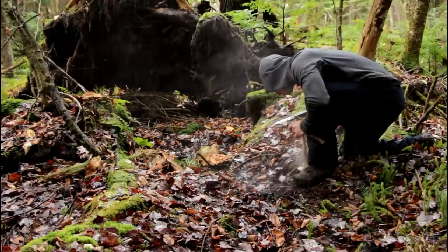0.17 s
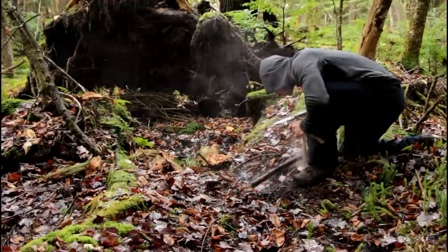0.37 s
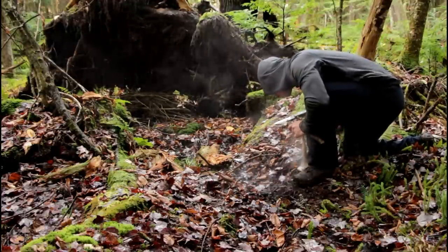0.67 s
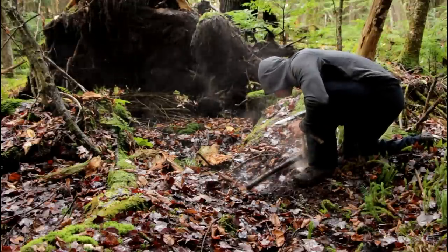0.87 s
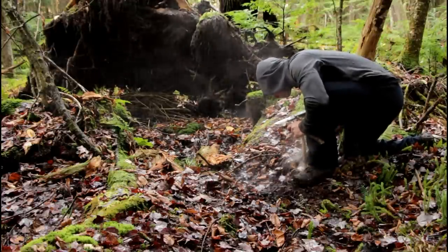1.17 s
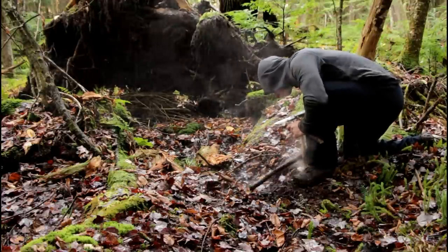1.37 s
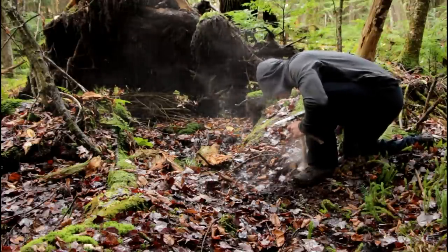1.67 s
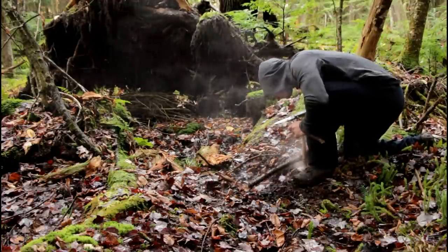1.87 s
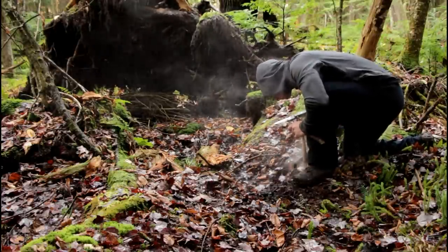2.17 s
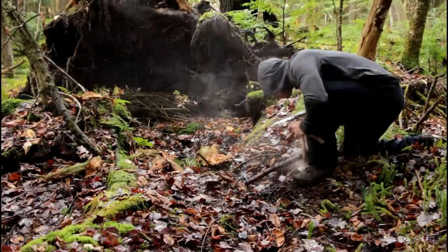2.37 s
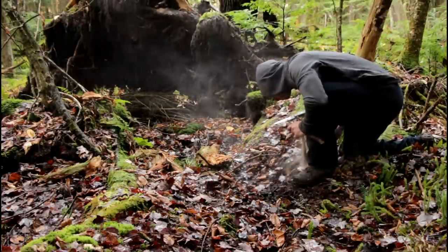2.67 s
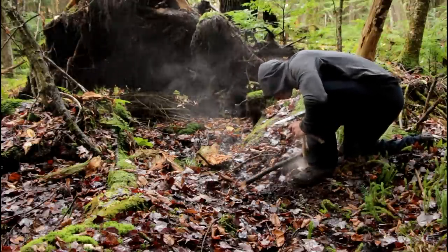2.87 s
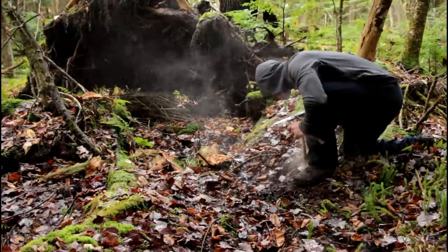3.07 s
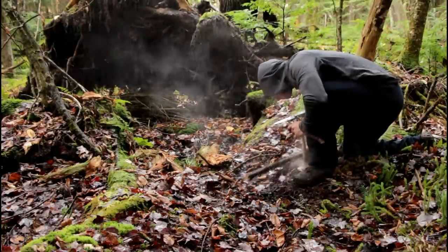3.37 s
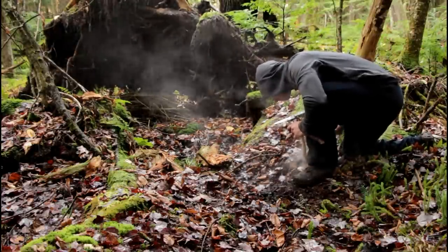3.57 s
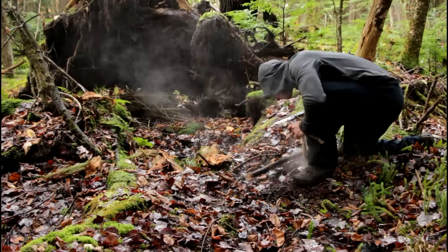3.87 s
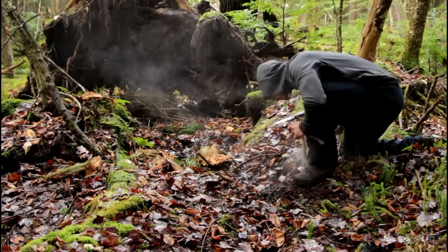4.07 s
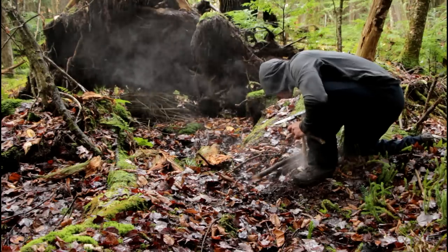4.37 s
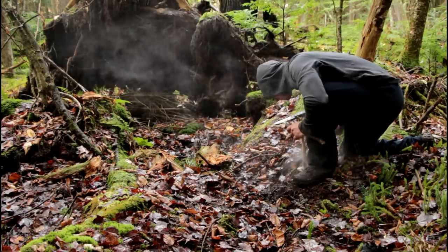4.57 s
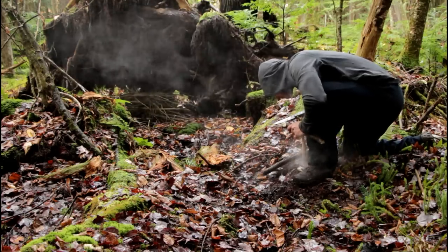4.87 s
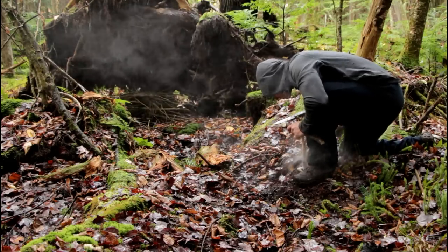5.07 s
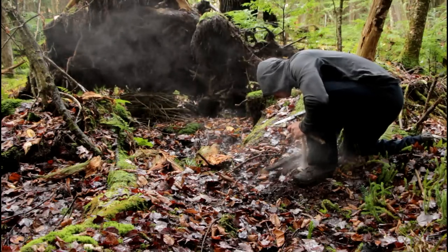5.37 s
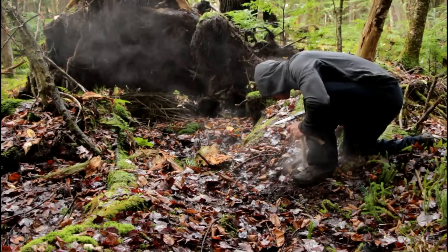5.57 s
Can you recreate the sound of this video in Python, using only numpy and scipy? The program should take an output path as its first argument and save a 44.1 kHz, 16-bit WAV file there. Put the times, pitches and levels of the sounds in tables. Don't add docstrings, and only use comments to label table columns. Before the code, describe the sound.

Fast bow-drill strokes alternate a gritty hum and a thin squeal outdoors, with dripping on leaf litter and one loud drop beside the microphone.

```python
import sys
import numpy as np
from scipy import signal
from scipy.fft import rfft, irfft, next_fast_len
from scipy.io import wavfile
from scipy.ndimage import map_coordinates

SR = 44100
rng = np.random.default_rng(int(sys.argv[2]) if len(sys.argv) > 2 else 0)


def int16_out(signal):
    q = np.round(np.clip(np.atleast_2d(signal).T, -1, 1) * 32767)
    wavfile.write(sys.argv[1], SR, q.astype(np.int16))


def elevation(decibels):
    levels = np.asarray(decibels, float)
    return 10 ** (levels / 20)


N = 251806
TIME = np.arange(N) / SR


def unit(x):
    return x / np.sqrt(np.mean(x ** 2) + 1e-20)


def along(points, hz):
    f, value = np.transpose(points)
    return np.interp(np.log(hz + 1), np.log(f + 1), value)


def wobble(rate):
    knots = rng.standard_normal(int(N * rate / SR) + 4)
    return map_coordinates(knots, [TIME * rate])


def filtered(x, response):
    size = next_fast_len(x.shape[-1] + 4096)
    spectrum = rfft(x, size) * response(np.fft.rfftfreq(size, 1 / SR))
    return irfft(spectrum, size)[..., :x.shape[-1]]


def mode(f, hz, width):
    return 1j * f * width / (hz * hz - f * f + 1j * f * width)


def stereo(pair, alike):
    def mid_side(f):
        turn = np.arccos(np.clip(alike(f), -1, 1)) / 2
        return np.array([np.cos(turn), np.sin(turn)])

    mid, side = filtered(pair, mid_side)
    return np.array([mid + side, mid - side])


def add(track, s, sound):
    part = track[:, max(round(s * SR), 0):][:, :sound.shape[-1]]
    part += sound[..., :part.shape[1]]


# f/Hz, level/dB [dB per Hz]
FOREST = [(18, -45), (30, -39), (157, -1.5), (740, -1.5), (1860, -4), (2230, -3), (2900, -7), (3310, -3.5),
          (4300, -9), (6050, -9), (7090, -11.5), (10800, -17), (16000, -23.5)]
# t/s, level/dB
FAR = [(0, -68.5), (1.2, -68), (2.4, -68.5), (3.6, -70.5), (4.8, -74.5), (5.7, -71)]
# f/Hz, likeness [0-1]
ALIKE = [(60, 0.27), (130, 0.93), (290, 0.27), (640, 0.36), (1410, 0.13), (3100, 0.36), (6820, 0.28),
         (15000, 0.029)]


def forest():
    hiss = filtered(rng.standard_normal((2, N)), lambda f: elevation(along(FOREST, f)))
    hiss = elevation(-50) * unit(stereo(hiss, lambda f: along(ALIKE, f) - 0.1))
    hiss = hiss * elevation(0.8 * wobble(6) + 1.2 * wobble(40))
    low = stereo(rng.standard_normal((2, N)), lambda f: 0.68 + 0 * f)
    low = unit(filtered(low, lambda f: mode(f, 70, 17) ** 2 + 0.85 * mode(f, 106, 17.5) ** 2))
    return hiss + low * elevation(np.interp(TIME, *np.transpose(FAR)))


# t/s, level/dB, length [s]
RUSTLE = [
    (5.27, -41.5, 0.0095),
    (5.289, -41.5, 0.022),
    (5.39, -49.5, 0.092),
    (5.625, -43, .02),
]


def rustle():
    swell = sum(elevation(db) * np.exp(-((TIME - s) / length) ** 2) for s, db, length in RUSTLE)
    clicks = rng.standard_normal((2, N)) * elevation(5.8 * rng.standard_normal(N))
    clicks = stereo(clicks, lambda f: 0.25 + 0 * f)
    return swell * unit(filtered(clicks, lambda f: mode(f, 3350, 5900) ** 2))


def spray(t, t60):
    noise = stereo(rng.standard_normal((2, len(t))), lambda f: 1 - f / 14000)
    return noise * elevation(-60 * t / t60) * (1 - np.exp(-t / 0.00032))


# t/s, peak level/dB, f/Hz, splash level/dB, left-right level/dB
DRIPS = [(.0089, -23.5, 1530, 0, 0), (.0182, -28.5, 1100, -4, -4), (0.0935, -26, 4000, -14, 0),
         (.5046, -26, 2420, -17, 2), (.837, -30.5, 1200, 1, -3.4), (1.1633, -30, 3580, -22, 0),
         (1.3572, -25.5, 2120, -5, -7), (1.7388, -17, 1870, 2.5, 2.5), (1.8683, -25, 2040, -6, -3.2),
         (1.9688, -28.5, 1830, -11, -10), (2.031, -15, 2160, -12, -0.5), (2.4587, -28, 1260, -4, -.7),
         (2.4847, -16, 4000, -17, -12), (2.6722, -18, 1700, -7.5, 2), (2.8215, -22, 1960, -4.5, 2),
         (2.8859, -21.5, 1474, -9, -4), (2.9038, -28, 3890, -15, 8), (3.4, -28.5, 2600, -14, 9),
         (4.2658, -33.5, 1000, -5, -1.7), (4.442, -32, 1100, -2, -1), (4.9265, -26.5, 1500, -8, -.4),
         (5.5003, -25, 2200, -4.5, -5)]
# t/s, peak level/dB, f/Hz, left-right level/dB
STIFF = [
    (1.7393, -27, 8700, 1),
    (2.485, -38, 7800, -3),
    (2.675, -25.5, 7500, -3),
    (3.894, -33, 3800, 5),
    (4.871, -32.5, 4600, 4),
    (5.5, -26.5, 9600, -3),
    (5.5975, -19, 3630, 3),
    (5.5992, -30, 4540, -4),
]
# t/s, peak level/dB, f/Hz
TICKS = [(0.2495, -30, 3800), (.457, -35, 1500), (.529, -39, 2490), (1.2022, -35, 3210),
         (1.223, -31.5, 2700), (1.5245, -31, 4720), (1.668, -35, 1500), (1.931, -35.5, 911),
         (2.5194, -28, 2200), (2.6522, -32, 2660), (2.7144, -31, 3060), (3.004, -28, 3690),
         (3.4691, -31, 4670), (4.5678, -31, 3500), (4.8467, -31, 3500), (4.9475, -33, 2680),
         (5.271, -36, 547)]


def drips():
    limp_sharp, tick_sharp, stiff_sharp_hz = 0.76, 1.5, 15000
    limp = [(s, db, hz, limp_sharp, splash, pan) for s, db, hz, splash, pan in DRIPS]
    stiff = [(s, db, hz, stiff_sharp_hz / hz, -6.5, pan) for s, db, hz, pan in STIFF]
    tick_pans_db = 3.5 * rng.standard_normal(len(TICKS))
    ticks = [(*row, tick_sharp, -7, pan) for row, pan in zip(TICKS, tick_pans_db)]

    out, t = np.zeros((2, N)), np.arange(2000) / SR
    for s, db, hz, sharp, splash_db, pan_db in limp + stiff + ticks:
        def leaf(f):
            return mode(f, hz, 1.66 * hz / sharp) ** 2 + elevation(-24) * mode(f, 6900, 5400) ** 2

        slap = -np.sin(np.pi * np.clip(2.36 * hz * t, 0, 1))
        splash = elevation(splash_db - 0.5) * spray(t, 0.023)
        sound = filtered(slap + splash, leaf)
        sides_db = np.array([[pan_db], [-pan_db]]) / 2
        add(out, s, elevation(db + sides_db) * sound / np.abs(sound).max())
    return out


# f/Hz, level/dB, time to die by 60 dB [s]
NEAR_RING = [
    (340, -34, 0.057),
    (482, -25.5, 0.035),
    (670, -21, 0.028),
    (950, -22, .018),
    (1290, -21, 0.012),
    (1540, -5.5, 0.0088),
    (4000, -23, 0.011),
    (5600, -17, .009),
]
# t/s [after the slap], level/dB
NEAR_BOUNCES = [
    (.0005, -1),
    (.0044, -12.5),
    (.0085, -31),
    (.016, -29),
]
# f/Hz, level/dB [dB per Hz]
NEAR_SPLASH = [(47, -50), (110, -14), (300, -5), (700, -4), (1630, -2), (5520, -8.5), (10500, -19),
               (16000, -35)]


def near_drop():
    start_s, level_db, right_delay_s = 3.7535, 12.5, 1.4 / SR
    t = np.arange(6000) / SR
    slap = -1.25 * np.sin(2 * np.pi * np.clip(t / 0.00025, 0, 1)) * elevation(-45000 * t)
    sound = np.ones((2, 1)) * slap
    ring = sum(elevation(db - 60 * t / t60) * np.sin(2 * np.pi * hz * t) for hz, db, t60 in NEAR_RING)
    for delay, db in NEAR_BOUNCES:
        add(sound, delay, elevation(db) * ring)

    noise = unit(filtered(spray(t, 20), lambda f: elevation(along(NEAR_SPLASH, f))))
    fade = elevation(-14.5 - 60 * t / 0.026) + elevation(-44 - 60 * t / 0.04)
    sound = sound + noise * fade * (1 - np.exp(-t / 0.00026))
    sound = filtered(sound, lambda f: elevation(level_db) * (1j * f / (1j * f + 75)) ** 3)

    out = np.zeros((2, N))
    add(out, start_s, sound * [[elevation(-0.3)], [0]])
    add(out, start_s + right_delay_s, sound * [[0], [elevation(-1.7)]])
    return out


# t/s, peak level/dB
JOLTS = [(0.226, -43), (0.722, -49), (1.21, -45.5), (1.679, -41.5), (2.178, -48), (2.658, -44),
         (3.131, -45.5), (3.625, -50), (4.112, -44.5), (4.589, -48), (5.077, -40), (5.571, -46.5)]


def jolts():
    out, t = np.zeros((2, N)), np.arange(2000) / SR
    cycles = 170 * t + 0.37 * (1 - np.exp(-t / 0.0013))
    knock = -elevation(-60 * t / 0.033) * np.sin(2 * np.pi * cycles)
    for s, db in JOLTS:
        add(out, s + 0.00448, elevation(db + 3.5) * knock)
        add(out, s + 0.029, elevation(db - 2) * knock)
    return out


# t/s, rasp level/dB at full speed
STROKES = [(0.019, -44), (0.266, -44.5), (.493, -44.5), (.742, -44.5), (.981, -44), (1.227, -45.5),
           (1.468, -44), (1.709, -46), (1.953, -43.5), (2.199, -46), (2.436, -43.5), (2.685, -44),
           (2.918, -43.5), (3.166, -44.5), (3.401, -44.5), (3.636, -47.5), (3.878, -45), (4.132, -46),
           (4.371, -44), (4.62, -44.5), (4.858, -45.5), (5.1, -49), (5.345, -47.5), (5.581, -48.5),
           (5.83, -44)]


def stroke_count():
    return np.interp(TIME, np.transpose(STROKES)[0], np.arange(len(STROKES)))


def spin(flat, stall):
    stroke = stroke_count()
    bow = np.abs(np.sin(np.pi * stroke))
    return stroke.astype(int), np.clip((bow - stall) / (1 - stall), 0, 1) ** flat


# f/Hz, width [Hz], level/dB
PULL = [
    (697, 490, -12.5),
    (1048, 130, -1.5),
    (2630, 1130, -3.5),
    (3170, 400, -13),
    (4610, 160, 3),
    (4940, 970, -4.5),
    (7450, 1290, -6.5),
    (10430, 850, -15),
]
# f/Hz, width [Hz], level/dB
PUSH = [
    (475, 260, -10),
    (1697, 160, -2.5),
    (2600, 860, -1),
    (4605, 330, 2.5),
    (5290, 1830, -6),
    (7500, 1420, -4.5),
    (10370, 1500, -11.5),
]
# f/Hz, level/dB
GRIT = [(100, -50), (250, -12), (700, -11.5), (2000, -13), (4000, -5.5), (6300, -14.5), (9000, -14),
        (13000, -20), (16000, -27)]


def rasp():
    def dull(f):
        return 1 / (1 + (f / 5000) ** 2)

    def grit(f):
        return elevation(along(GRIT, f) + 3)

    out = 0
    for way, (modes, flat) in enumerate([(PULL, 0.5), (PUSH, 0.62)]):
        stroke, speed = spin(flat, 0.09)
        level_db = np.transpose(STROKES)[1][stroke] + 1.2 * wobble(200)
        force = speed * (stroke % 2 == way) * elevation(level_db)
        force = force * elevation(1.96 * rng.standard_normal(N))
        scrape = force * rng.standard_normal((2, N))
        out = out + filtered(scrape, lambda f: grit(f) * dull(f) ** 0.5)
        fizz = force * speed ** 1.6 * rng.standard_normal((2, N))
        out = out + filtered(fizz, lambda f: grit(f) * (1 - dull(f)) ** 0.5)
        for hz, width, db in modes:
            come_and_go = elevation(1.74 * wobble(18) + 1.1 * wobble(70))
            grains = force * speed ** (hz / 7000) * come_and_go * rng.standard_normal((2, N))
            out = out + filtered(grains, lambda f: elevation(db + 3.5) * mode(f, hz, width) ** 2)
    return elevation(9.5) * stereo(out, lambda f: along(ALIKE, f) + 0.38)


# t/s, f/Hz, level/dB
SINGING = [(.38, 2850, -40), (.87, 2870, -41), (1.34, 2880, -42.5), (1.83, 2930, -43), (2.32, 3000, -43),
           (2.81, 2970, -41.5), (3.28, 2940, -41), (3.76, 2940, -44), (4.26, 2960, -42), (4.74, 2950, -40),
           (5.23, 2900, -46), (5.7, 2930, -47.5)]


def locked_hz():
    climb_hz = 59.9
    drift_hz = np.interp(TIME, *np.transpose(SINGING)[:2])
    return drift_hz - climb_hz * np.cos(np.pi * (stroke_count() % 1)) / 2


def singing():
    stroke, speed = spin(1.4, 0.12)
    s, hz, db = np.transpose(SINGING)
    phase = 2 * np.pi * np.cumsum(locked_hz() - 120 * (1 - speed)) / SR
    kicks = rng.standard_normal((2, N)) * elevation(0.99 * wobble(90))
    a, b = unit(filtered(kicks, lambda f: 1 / (1 + 1j * f / 90) / (1 + 1j * f / 400)))
    tone = a * np.sin(phase) + b * np.cos(phase)
    return elevation(np.interp(TIME, s, db) - 0.5) * speed * (stroke % 2) * tone


# t/s, peak level/dB, length [ms]
SQUEAL = [(.369, -32, 17), (0.383, -25, 11), (.4, -27, 11.6), (.8671, -35, 5.4), (0.877, -32, 3.4),
          (0.887, -30.5, 5.8), (.9021, -36, 22), (1.3073, -33, 4.9), (1.3512, -33, 3.6), (1.8013, -35, 4.7),
          (1.831, -26.5, 7.6), (1.8489, -30.5, 14), (1.8617, -27.5, 4.5), (2.2872, -31.5, 2.4),
          (2.3204, -22, 5.4), (2.3362, -32, 12), (2.802, -31, 8.2), (2.8172, -30, 8), (2.8293, -30.5, 8.4),
          (3.272, -35, 7.8), (3.3061, -30, 4.8), (3.7933, -27.5, 4.3), (4.2185, -32.5, 5.7),
          (4.2684, -28, 6), (4.281, -29, 11), (4.725, -29.5, 11), (4.7488, -28.5, 8.4), (5.223, -30.5, 4),
          (5.2389, -35, 4.3), (5.7043, -37, 2.9)]


def chatter():
    per_s, below_singing_db, length_ms, speed_needed = 70, -5, 6.8, 0.85
    stroke, speed = spin(1.1, 0.1)
    draw = rng.standard_normal((500, 3))
    s = np.cumsum(np.exp(0.28 * draw[:, 0])) / per_s
    at = np.minimum(s * SR, N - 1).astype(int)
    db = np.interp(s, *np.transpose(SINGING)[::2]) + below_singing_db + 3 * draw[:, 1]
    ms = length_ms * np.exp(0.3 * draw[:, 2])
    free = np.abs(s[:, None] - np.transpose(SQUEAL)[0]).min(axis=1) > 0.008
    keep = (stroke[at] % 2 == 1) & (speed[at] > speed_needed) & free & (s < N / SR)
    return np.transpose([s, db, ms])[keep]


def squeal():
    spells = sorted(SQUEAL + [tuple(row) for row in chatter()])
    stray_hz = 35.14 * wobble(60)
    phase = 2 * np.pi * np.cumsum(locked_hz() + stray_hz) / SR
    swell, t = np.zeros(N), np.arange(-1200, 1200) / SR
    for k, (s, db, ms) in enumerate(spells):
        shape = np.exp(-(t / (ms * np.where(t < 0, 0.00055, 0.0009))) ** 2)
        add(swell[None], s + t[0] - 0.0012, (-1) ** k * elevation(db) * shape)
    tone = swell * (np.sin(phase) + elevation(-26) * np.sin(2 * phase))
    return (tone + singing()) * elevation([[-1.6], [1.6]])


# f/Hz, left-right level/dB
BALANCE_DB = [(60, 1), (110, -0.5), (200, -1), (380, 0.5), (700, -1.5), (1290, -0.5), (2380, -3.5),
              (4400, -3), (8120, -3), (15000, -3.5)]


def scene():
    def shade(f):
        return elevation(np.array([[0.5], [-0.5]]) * along(BALANCE_DB, f))

    shaded = filtered(rasp() + forest() + rustle(), shade)
    return shaded + squeal() + drips() + near_drop() + jolts()


def band_limit(x):
    return signal.sosfilt(signal.butter(12, 16850, fs=SR, output="sos"), x)


# t/s, level/dB
GAIN = [
    (3.7462, 1),
    (3.7478, -11),
    (3.775, -9),
    (4.2, -7.5),
    (4.6, -5),
    (4.85, -5),
    (5.0, 3),
    (5.3, 4),
]
# f/Hz, level/dB
TOP = [(20, 0), (15700, 0), (16000, -35), (16800, -42)]


def record(dry):
    heard = dry * elevation(np.interp(TIME, *np.transpose(GAIN)))
    heard = heard / (1 + np.abs(heard / 1.5) ** 4) ** 0.25
    heard = filtered(heard, lambda f: elevation(along(TOP, f)) * (1j * f / (1j * f + 80)) ** 3)
    noise = filtered(rng.standard_normal(dry.shape), lambda f: 1 / (1 + (f / 45) ** 4))
    return band_limit(heard + elevation(-93) * unit(noise))


dry = scene()
out = record(dry)
int16_out(out)
```